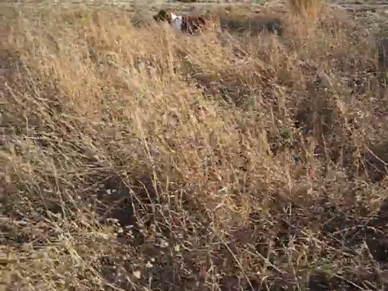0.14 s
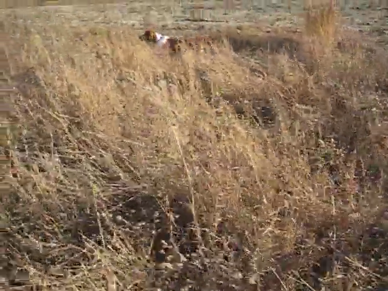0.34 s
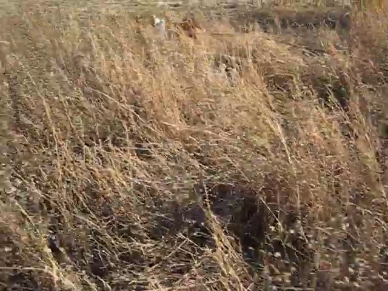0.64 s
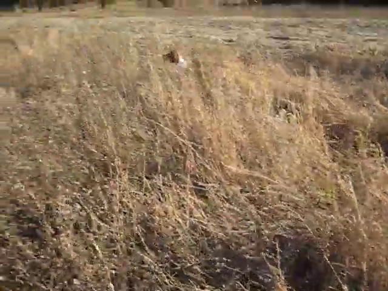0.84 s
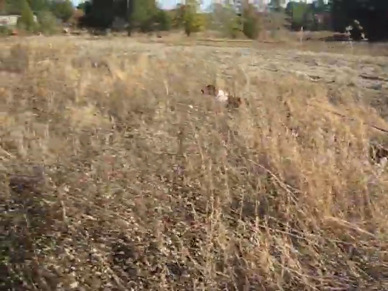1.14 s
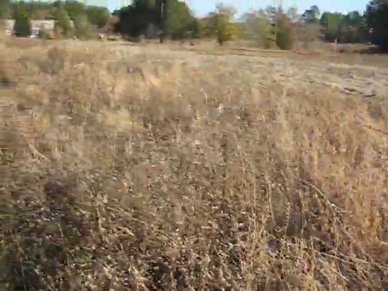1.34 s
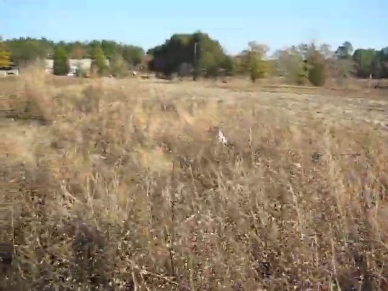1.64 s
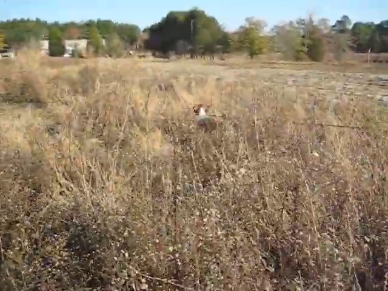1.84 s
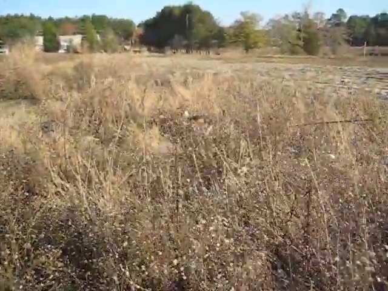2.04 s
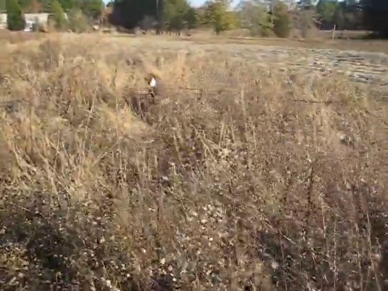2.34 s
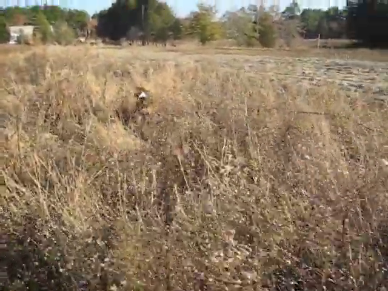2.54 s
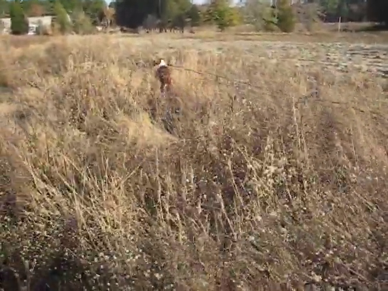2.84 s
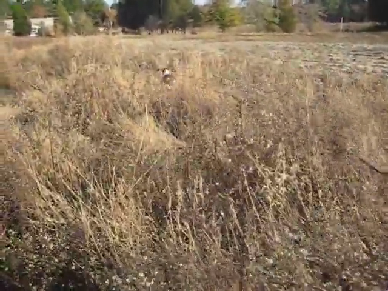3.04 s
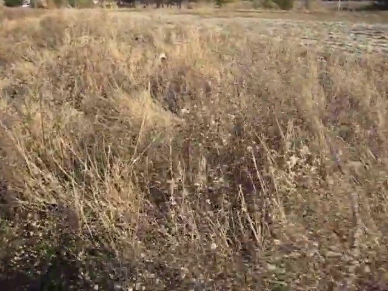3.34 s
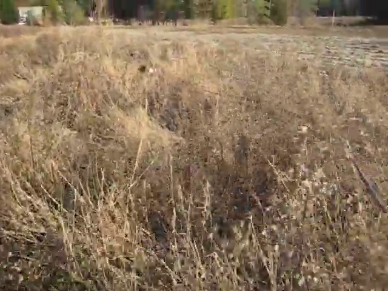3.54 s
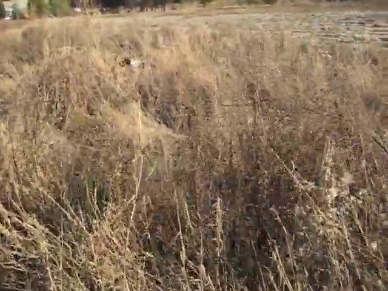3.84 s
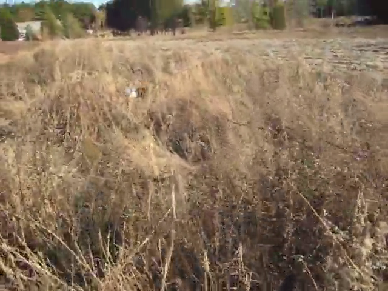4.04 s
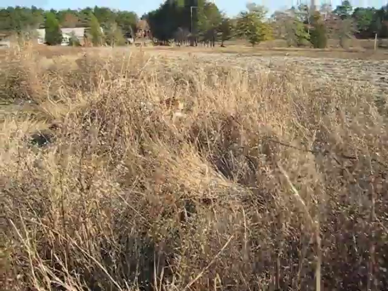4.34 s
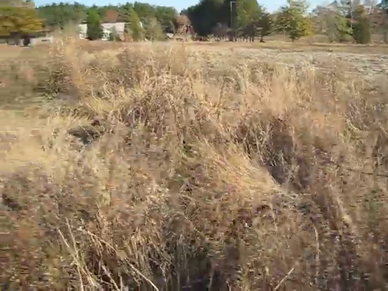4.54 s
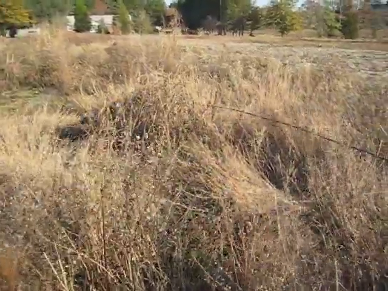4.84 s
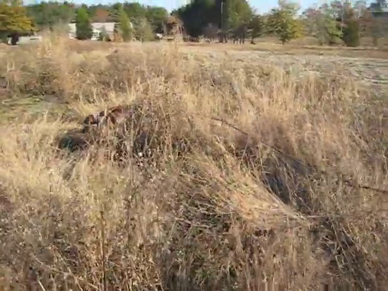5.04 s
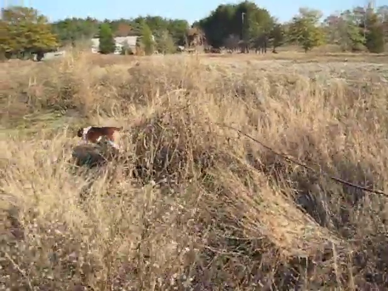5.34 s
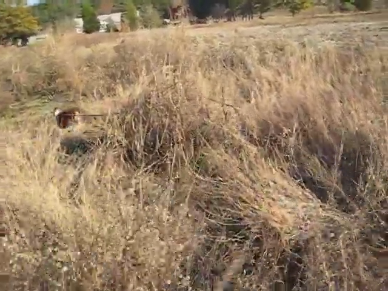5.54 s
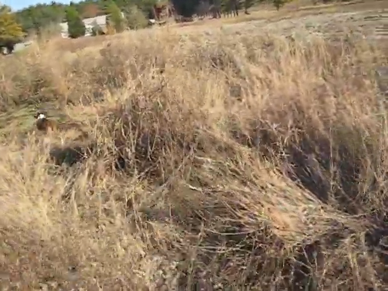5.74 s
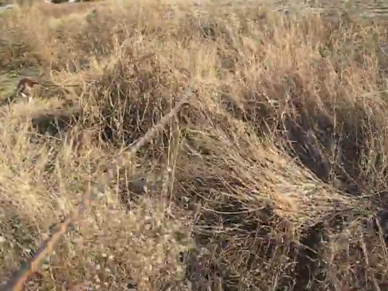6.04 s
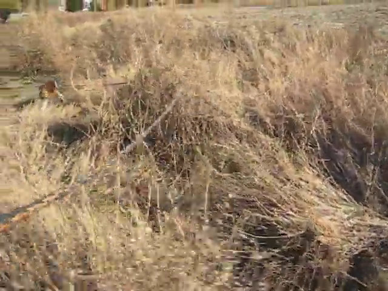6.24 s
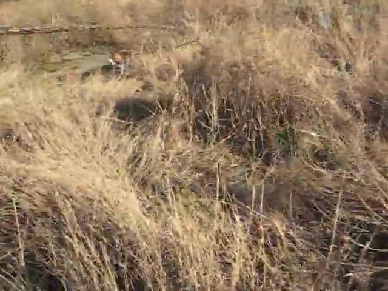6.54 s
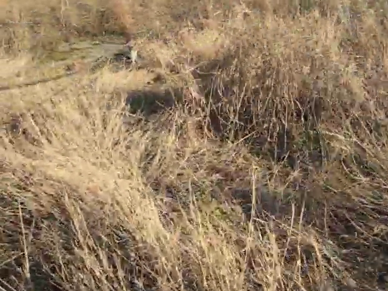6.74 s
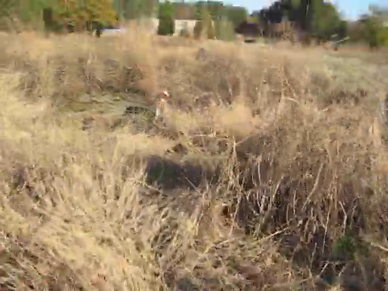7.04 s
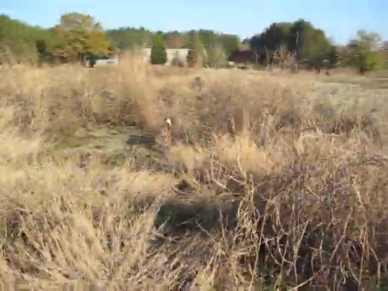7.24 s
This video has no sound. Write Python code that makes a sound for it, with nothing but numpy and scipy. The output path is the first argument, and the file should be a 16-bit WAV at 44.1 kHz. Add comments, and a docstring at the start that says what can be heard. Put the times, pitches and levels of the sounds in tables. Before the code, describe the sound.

Dense, crisp rustling of dry weeds brushed at very close range, peppered with sharp twig snaps, small woody knocks and duller stem drags.

```python
"""Wading through tall dry grass

Clumped noise grains make the dry blades crackle past the legs and thicker stems drag duller.
Enveloped noise bursts snap brittle stems; decaying sine pairs knock hollow ones.
Low noise makes wind and footfalls, narrow-band noise the far crickets, a drone and stem rubs;
short pulses shove the capsule. The recorder's gain control ducks after loud peaks.
Table levels are those ahead of the gain control."""
import sys
import numpy as np
from scipy import signal
from scipy.io import wavfile
from scipy.ndimage import uniform_filter1d

SR = 44100
rng = np.random.default_rng(int(sys.argv[2]) if len(sys.argv) > 2 else 0)


def log_audio(samples):
    """Write samples as a 16-bit WAV file to the path given in sys.argv[1]."""
    # one column per channel
    frames = np.atleast_2d(samples).T
    # limit to full scale, then quantise
    limited = np.clip(frames, -1, 1)
    pcm = np.round(limited * 32767).astype(np.int16)
    wavfile.write(sys.argv[1], SR, pcm)


N = 326140

# far crickets: (time [s], level [dB])
CRICKET_LEVELS = [(0, -42), (.7, -48), (1, -41.5), (2.3, -41.5), (2.6, -43), (3.5, -45), (3.8, -41),
                  (5.55, -44), (5.75, -45), (7.4, -59.5)]
# wind on the microphone: (time [s], level [dB])
WIND_LEVELS = [(0.0, -58), (0.56, -56), (1.15, -59), (2.86, -58.5), (3.46, -63), (3.91, -59), (5.12, -59.5),
               (6.24, -58.5), (6.75, -62), (7.39, -50.5)]
# wind colour: (frequency [Hz], relative density [dB per Hz])
WIND_SPECTRUM = [(12, -46), (20, -6), (91, -3), (156, -3.5), (400, -11.5), (520, -50), (880, -120)]
# soft footfalls through hand and strap: (time [s], length [s], rms before fades [dB])
FOOTFALLS = [(0.526, .07, -42.5), (.6, .05, -50), (0.746, 0.076, -52), (6.288, 0.09, -49),
             (7.017, 0.054, -50)]
# one-sided shoves of air or casing on the capsule: (time [s], peak [dB])
CAPSULE_SHOVES = [(0.3103, -27), (0.386, -23), (0.454, -28), (1.45, -20.5), (1.668, -36), (3.9758, -28),
                  (4.357, -29), (5.295, -37)]
# stem sliding on cloth: (time [s], length [s], resonance [Hz], rms before fades [dB])
STEM_RUBS = [(1.995, 0.047, 1020, -39.5), (2.085, .04, 1040, -37.5), (2.14, 0.042, 960, -43),
             (2.185, .03, 810, -35), (3.889, .025, 825, -36), (4.074, .02, 980, -35),
             (7.145, 0.032, 960, -41)]
# thick stems brushing the trousers: (time [s], level [dB])
DRAG_LEVELS = [(0.0, -45), (0.18, -40), (0.95, -47), (1.09, -34), (1.19, -42), (1.6, -42), (2.05, -42.5),
               (2.2, -35.5), (2.3, -38), (3.4, -43.5), (3.62, -36.5), (5.15, -40), (5.66, -43), (5.8, -37),
               (6.06, -41), (6.2, -42.5), (6.69, -44.5), (6.79, -36.5), (6.84, -47.5), (7.17, -34.5),
               (7.39, -39.5)]
# thick stem colour: (frequency [Hz], filter gain [dB])
STEM_SPECTRUM = [(120, -22.5), (250, -5.5), (600, -2.5), (950, 1.5), (1300, -0.5), (1800, -5),
                 (3000, -12.5)]
# hollow stems hitting leg, strap or casing: (time [s], peak [dB], ring [Hz], T60 [s])
STEM_KNOCKS = [(0.1684, -22, 1500, 0.008), (0.1838, -25, 1480, 0.008), (0.219, -23, 1180, 0.006),
               (0.2364, -19, 1730, 0.006), (0.2893, -21, 1150, 0.011), (0.3098, -20, 1540, 0.006),
               (0.3874, -20, 940, 0.01), (0.4526, -23, 560, 0.008), (0.5945, -26, 1900, 0.007),
               (1.5266, -25, 1080, 0.017), (1.5892, -6.5, 900, 0.007), (2.205, -20, 850, 0.013),
               (2.2519, -19, 760, 0.016), (2.3176, -22, 1740, 0.026), (2.4439, -24, 1370, 0.017),
               (2.4673, -25, 1650, 0.009), (3.4282, -13, 1010, 0.006), (3.5776, -23, 1610, 0.018),
               (3.619, -22, 1110, 0.007), (3.6393, -20, 1010, 0.009), (3.6569, -19, 840, 0.012),
               (3.9254, -18, 1130, 0.009), (3.9602, -22, 1640, 0.009), (4.1028, -22, 980, 0.028),
               (4.2318, -23, 1010, 0.011), (4.3569, -18, 1560, 0.005), (4.4345, -22, 800, 0.006),
               (4.4401, -15, 900, 0.007), (4.45, -17, 1000, 0.005), (4.48, -20, 1040, 0.008),
               (4.6043, -18, 1310, 0.009), (5.0717, -17, 990, 0.007), (5.3855, -17, 820, 0.006),
               (5.3977, -17, 950, 0.007), (6.0294, -26, 1060, 0.013), (6.1188, -19, 1360, 0.009),
               (6.139, -14, 1110, 0.006), (6.2079, -16, 1300, 0.01), (6.2232, -16, 1490, 0.007),
               (6.2951, -16, 960, 0.008), (6.3802, -25, 1210, 0.01), (6.796, -24, 700, 0.01),
               (6.9502, -27, 680, 0.014), (7.0055, -21, 1350, 0.005)]
# brittle stems breaking: (time [s], rms at the break [dB], band centre [Hz], T60 [s])
STEM_SNAPS = [(.1471, -13.5, 11100, .005), (.184, -10, 8760, .014), (.2, -11.5, 8720, .007),
              (.2111, -13.5, 8370, .004), (.2193, -12.5, 6990, .012), (.2364, -13, 8020, .01),
              (.2753, -9.5, 6550, .005), (.2811, -13.5, 6020, .03), (.2893, -13.5, 5920, .005),
              (.3101, -9.5, 8940, .012), (.3874, -7.5, 4820, .007), (.5949, -10.5, 5570, .007),
              (.8786, -12, 9750, .004), (1.22, -13.5, 8400, .025), (1.3275, -11.5, 8390, .005),
              (1.4225, -9.5, 6790, .01), (1.4505, -10.5, 9290, .012), (1.5268, -11.5, 7520, .013),
              (1.5797, -15.5, 6510, .007), (1.5888, -12.5, 3500, .006), (1.669, -7.5, 5360, .005),
              (1.8686, -11.5, 7220, .009), (1.9468, -12.5, 10590, .004), (2.3201, -9.5, 8230, .013),
              (2.4442, -10.5, 7680, .009), (2.4675, -8.5, 9170, .005), (2.4736, -9.5, 7910, .013),
              (2.6233, -11.5, 6290, .005), (2.6358, -15.5, 9500, .012), (2.9581, -14.5, 10770, .007),
              (3.4282, -11.5, 4610, .005), (3.4895, -10, 10140, .012), (3.5776, -11.5, 7540, .009),
              (3.6422, -12.5, 9350, .007), (3.9009, -12.5, 6410, .004), (3.9619, -15.5, 6090, .004),
              (3.9754, -6.5, 5490, .005), (4.0012, -11.5, 7860, .007), (4.0473, -9.5, 7510, .003),
              (4.3572, -12.5, 5950, .007), (4.3792, -13.5, 7000, .003), (4.4345, -10.5, 7230, .005),
              (4.44, -14.5, 7360, .01), (4.45, -14, 5850, .004), (4.4802, -14, 5720, .004),
              (4.5166, -10.5, 7240, .004), (5.2528, -13.5, 7620, .023), (5.3017, -14.5, 8640, .005),
              (5.385, -12.5, 8020, .005), (5.6484, -10.5, 7340, .004), (5.8873, -11.5, 12470, .018),
              (6.0541, -11, 5650, .018), (6.1224, -13.5, 7000, .008), (6.139, -9.5, 5450, .009),
              (6.1835, -12.5, 5390, .007), (6.2081, -7, 4580, .009), (6.2231, -8, 6870, .005),
              (6.2812, -13.5, 9760, .009), (6.295, -14.5, 7050, .007), (6.3822, -12.5, 7990, .004),
              (6.4186, -12.5, 7290, .007), (6.4816, -10.5, 7230, .007), (6.4922, -10.5, 6210, .003),
              (6.6329, -12.5, 8990, .005), (6.6813, -10.5, 6080, .013), (6.7541, -11.5, 6280, .007),
              (6.9501, -9.5, 9030, .003), (7.0054, -11.5, 5940, .007), (7.0875, -11.5, 9670, .003)]
# blades past the legs: (time [s], crackle level [dB], treble lift [dB])
BLADE_LEVELS = [(0.0, -32, -10), (0.17, -25.5, 3), (0.3, -30.5, 5), (0.45, -22.5, -4.5), (0.6, -26, 1.5),
                (0.98, -25, -3), (1.04, -23, 0), (1.4, -25, 2.5), (1.65, -24, -1), (1.93, -26, 1),
                (2.1, -23, -1.5), (2.5, -23, -1), (2.8, -23.5, -3.5), (3.0, -24.5, -0.5), (3.25, -24, 4.5),
                (3.77, -24.5, -4), (4.1, -23, -5), (4.55, -23.5, -7), (4.63, -21, -4), (4.8, -24, -2.5),
                (5.29, -22, 0), (5.4, -24, -0.5), (5.8, -22.5, 0), (6.2, -23.5, 0.5), (6.5, -23, 0),
                (6.9, -27.5, 7.5), (7.04, -26, -2), (7.39, -21, -2.5)]
# blade colour: (frequency [Hz], filter gain [dB])
BLADE_SPECTRUM = [(300, -42), (600, -32), (960, -18.5), (1550, -11), (2700, -7), (3050, -5), (4000, -4),
                  (6300, 0), (8200, 0), (11000, -2.5), (13800, -7.5), (15500, -11), (16200, -10.5)]
# brief dips of blades, stems and field: (time [s], depth [dB])
RUSTLE_DIPS = [(.25, 3), (1.23, 3.5), (3.59, 4), (4.16, 3), (5.30, 5.5), (5.655, 3), (5.90, 2)]

CRICKET_HZ, DRONE_HZ, DRONE_DB = 3333, 102.4, -68
SCUFF_DB, SCUFF_HALF_S = -25.5, 0.0076  # stir around each knock; level re knock peak
TWIGS_PER_S = 5
TWIG_DB, TWIG_HZ, TWIG_T60_S = -20.5, 7440, 0.013  # centres of the random spreads
DIP_FALL_S, DIP_BACK_S = 0.0071, 0.064
THRESHOLD_DB, DUCKING_DB_PER_DB = -18.0, 0.65
RECOVERY_DB_PER_S, GAIN_LAG_S = 135.0, 0.0018
OVERLOAD_LEVEL, EDGE_HZ = 0.72, 15750


def gain_of(db):
    """Decibels to an amplitude factor."""
    return 10 ** (np.asarray(db) / 20)


def evened(x):
    """Scales to rms 1."""
    return x / np.sqrt(np.mean(x ** 2) + 1e-20)


def read(points, hz):
    """Interpolates a spectrum table on a log-frequency axis."""
    f, value = np.transpose(points)
    return np.interp(np.log(hz + 1), np.log(f + 1), value)


def curve(rows, column):
    """Interpolates one column of a time table at every sample."""
    rows = np.array(rows)
    return np.interp(np.arange(N) / SR, rows[:, 0], rows[:, column])


def add(mix, start_s, sound):
    """Adds a short sound into the mix in place."""
    part = mix[round(start_s * SR):][:len(sound)]
    part += sound[:len(part)]


def coloured(x, points):
    """Filters x by a table with minimum phase, then scales to rms 1."""
    hz = np.fft.rfftfreq(4096, 1 / SR)
    log_gain = np.log(gain_of(np.maximum(read(points, hz), -100)))
    full = np.concatenate([log_gain, log_gain[-2:0:-1]])
    # Hilbert transform of log gain gives the phase
    response = np.exp(np.conj(signal.hilbert(full)))
    taps = np.fft.ifft(response).real[:2048]
    return evened(signal.oaconvolve(x, taps)[:N])


def band(x, hz, width_hz):
    """A resonance applied twice, scaled to rms 1."""
    b, a = signal.iirpeak(hz, hz / width_hz, SR)
    once = signal.lfilter(b, a, x)
    return evened(signal.lfilter(b, a, once))


def drift(seconds):
    """Smoothed random wander of rms 1."""
    size = max(round(seconds * SR), 2)
    once = uniform_filter1d(rng.standard_normal(N), size)
    return evened(uniform_filter1d(once, size))


def crackle(per_s, spread_db, t60_s, pitch_hz, clump_db, clump_s, hiss_db):
    """Tiny fractures: clumped noise grains, most small, a few large, tinted, over hiss; rms 1."""
    shapes = rng.standard_normal((14, 768))
    struck = rng.random(N) < per_s / SR
    which = rng.integers(0, len(shapes), N)
    sizes_db = spread_db * np.minimum(rng.exponential(1, N), 5.5)
    clicks = struck * gain_of(sizes_db + clump_db * drift(clump_s))

    t = np.arange(shapes.shape[1]) / SR
    fade = gain_of(-60 * t / t60_s) * np.minimum(t / (0.11 * t60_s), 1)
    tints_hz = np.minimum(pitch_hz * np.geomspace(.4, 2.2, len(shapes)), .4 * SR)
    grains = np.zeros(N)
    for k, (noise, hz) in enumerate(zip(shapes, tints_hz)):
        grain = (noise + 0.5 * band(noise, hz, 0.49 * hz)) * fade
        grains += signal.oaconvolve(clicks * (which == k), grain)[:N]
    hiss = gain_of(hiss_db) * rng.standard_normal(N)  # re grains
    return evened(evened(grains) + hiss)


def field():
    """Far crickets blur into fluttering narrow-band noise, over a faint low drone."""
    flutter_db = 2.3 * drift(0.031)
    level = gain_of(curve(CRICKET_LEVELS, 1) + flutter_db)
    chorus = level * band(rng.standard_normal(N), CRICKET_HZ, 440)
    drone = gain_of(DRONE_DB) * band(rng.standard_normal(N), DRONE_HZ, 35)
    return chorus + drone


def wind():
    """Turbulence at the microphone port: low noise of lumpy level."""
    lumps_db = 0.46 * drift(0.02)
    rumble = coloured(rng.standard_normal(N), WIND_SPECTRUM)
    return gain_of(curve(WIND_LEVELS, 1) + lumps_db) * rumble


def thumps():
    """Footfalls through hand and strap: dull, short swells of low noise."""
    out = np.zeros(N)
    for s, length_s, db in FOOTFALLS:
        size = round(length_s * SR)
        low = evened(band(rng.standard_normal(8000), 82, 150)[-size:])
        add(out, s, gain_of(db) * low * signal.windows.tukey(size, .5))
    return out


def shoves():
    """A short one-sided pull on the diaphragm, with no ring."""
    out = np.zeros(N)
    t = np.arange(300) / SR / 0.00021  # in units of the time to peak
    for s, db in CAPSULE_SHOVES:
        add(out, s, -gain_of(db) * t * np.exp(1 - t))
    return out


def rubs():
    """A stem sliding on cloth sings: noise through a narrow resonance, swelling and fading."""
    out = np.zeros(N)
    for s, length_s, hz, db in STEM_RUBS:
        size = round(length_s * SR)
        tone = evened(band(rng.standard_normal(4000), hz, 120)[-size:])
        add(out, s, gain_of(db) * tone * signal.windows.tukey(size, .6))
    return out


def stems():
    """Thicker stems drag along the trousers: dull crackle that flares around each knock."""
    x = crackle(per_s=1500, spread_db=2.2, t60_s=.01, pitch_hz=900,
                clump_db=1.2, clump_s=.02, hiss_db=1.5)
    level = gain_of(curve(DRAG_LEVELS, 1))
    flare = np.hanning(round(2 * SCUFF_HALF_S * SR))
    for s, db, *_ in STEM_KNOCKS:
        add(level, s - SCUFF_HALF_S, gain_of(db + SCUFF_DB) * flare)
    return level * coloured(x, STEM_SPECTRUM)


def knocks():
    """A blow rings a hollow stem and one overtone; so small a body radiates little bass."""
    out, t = np.zeros(N), np.arange(4000) / SR
    for s, db, hz, t60_s in STEM_KNOCKS:
        envelope = gain_of(-60 * t / t60_s) * np.minimum(t * hz / 0.22, 1)
        overtone = 0.55 * np.sin(2 * np.pi * 1.78 * hz * t)
        ring = envelope * (np.sin(2 * np.pi * hz * t) + overtone)
        b, a = signal.butter(2, .42 * hz, "high", fs=SR)
        ring = signal.lfilter(b, a, ring)
        add(out, s, gain_of(db) * ring / abs(ring).max())
    return out


def twigs():
    """Smaller stems break at random: rows of the snap table with spread level, pitch and decay."""
    count = round(TWIGS_PER_S * N / SR)
    when, size, tint, ring = rng.random((count, 4)).T
    time_s = .01 + when * (N / SR - .01)
    level_db = TWIG_DB + 3 * (size - .5)
    centre_hz = TWIG_HZ * 2 ** (0.64 * (tint - .5))
    t60_s = TWIG_T60_S * 2 ** (1.5 * (ring - .5))
    return np.transpose([time_s, level_db, centre_hz, t60_s])


def snaps():
    """Fibres start to part, then the stem breaks: a noise spit, strongest in a broad band."""
    out = np.zeros(N)
    t = np.arange(1400) / SR - .004  # break at t = 0
    rise = gain_of(60 * np.minimum(t, 0) / 0.0034)
    for s, db, hz, t60_s in [*STEM_SNAPS, *twigs()]:
        noise = rng.standard_normal(len(t))
        thin = signal.lfilter([1, -1], [1, -.8], noise)  # thin stems radiate little bass
        shape = rise * gain_of(-60 * np.maximum(t, 0) / t60_s)
        spit = (1.3 * evened(thin) + band(noise, hz, 0.89 * hz)) * shape
        spit *= np.linalg.norm(shape) / np.linalg.norm(spit)  # energy of the envelope
        add(out, s + t[0] + .0004, gain_of(db) * spit)
    return out


def blades():
    """Thin dry blades rub: dense bright crackle with varying level and treble."""
    x = crackle(per_s=4500, spread_db=3.0, t60_s=0.0078, pitch_hz=6330,
                clump_db=1.87, clump_s=0.0067, hiss_db=2.0)
    x = coloured(x, BLADE_SPECTRUM)
    highpass = signal.butter(1, 9000, "high", fs=SR, output="sos")
    treble = signal.sosfiltfilt(highpass, x)
    lift = gain_of(curve(BLADE_LEVELS, 2)) - 1
    return gain_of(curve(BLADE_LEVELS, 1)) * (x + lift * treble)


def dips_db():
    """Summed depth of the dips: a quick drop and a slower return each."""
    t, depth_db = np.arange(N) / SR, np.zeros(N)
    corners_s = [0, DIP_FALL_S, DIP_FALL_S + DIP_BACK_S]
    for s, db in RUSTLE_DIPS:
        depth_db += db * np.interp(t - s, corners_s, [0, 1, 0])
    return depth_db


def scene():
    """One microphone feeds both channels."""
    rustle = (field() + stems() + blades()) / gain_of(dips_db())
    mono = rustle + wind() + thumps() + shoves() + rubs() + knocks() + snaps()
    return np.array([mono, mono])


def record(dry):
    """Gain falls a moment after each loud peak and creeps back; soft overload; band limit."""
    power = uniform_filter1d(dry[0] ** 2, 66, origin=32)  # 1.5 ms mean
    level_db = 10 * np.log10(abs(power) + 1e-12)
    climb_db = np.arange(N) * RECOVERY_DB_PER_S / SR
    held_db = np.maximum.accumulate(level_db + climb_db) - climb_db
    over_db = np.maximum(held_db - THRESHOLD_DB, 0)
    lag = np.exp(-1 / (GAIN_LAG_S * SR))
    loss_db = DUCKING_DB_PER_DB * signal.lfilter([1 - lag], [1, -lag], over_db)
    ducked = dry / gain_of(loss_db)
    limited = ducked / (1 + (ducked / OVERLOAD_LEVEL) ** 6) ** (1 / 6)
    lowpass = signal.firwin(511, EDGE_HZ, window=("kaiser", 10), fs=SR)
    return signal.oaconvolve(limited, lowpass[None], "same")


dry = scene()
out = record(dry)
log_audio(out)
```